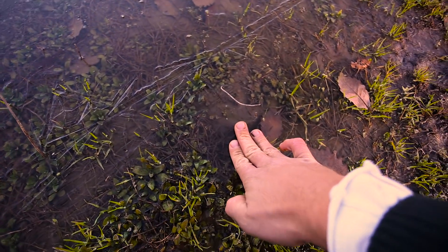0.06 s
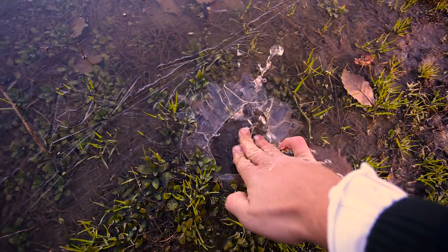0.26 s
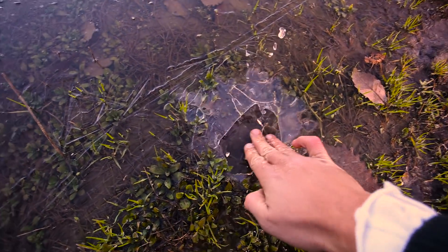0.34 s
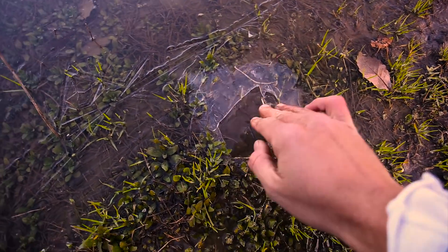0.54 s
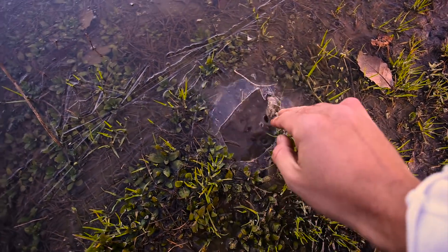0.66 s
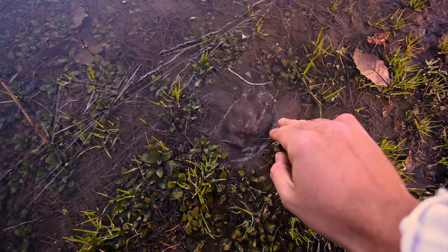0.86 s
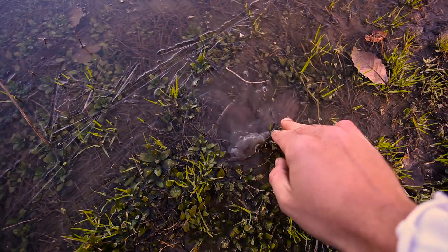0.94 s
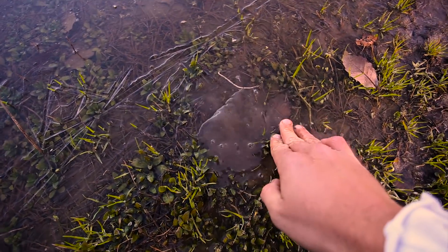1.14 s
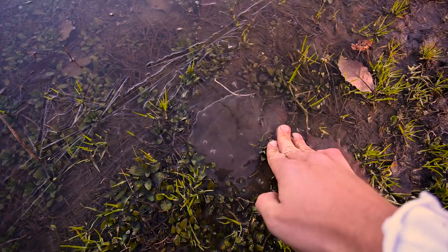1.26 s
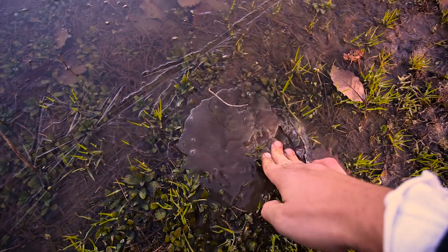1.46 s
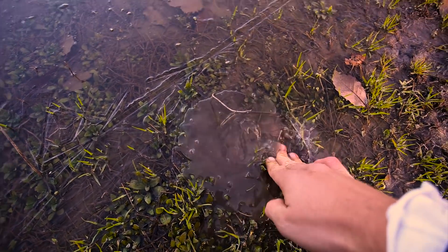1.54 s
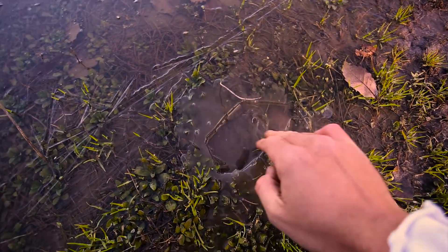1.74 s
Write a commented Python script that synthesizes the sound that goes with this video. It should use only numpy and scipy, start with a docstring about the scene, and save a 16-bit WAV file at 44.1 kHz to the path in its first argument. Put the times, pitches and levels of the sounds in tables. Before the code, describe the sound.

Sharp cracks of thin puddle ice breaking under a hand, with fine crackles and small drips.

```python
"""Outdoors at a shallow muddy puddle, fingers press through thin ice close to the microphone.
The sheet ticks under load, snaps and crunches; a second push breaks it in a run of cracks.
Each crack is a snap with a trail of micro-fractures, and the air pocket under the sheet rings along.
Fine crackle follows the pressure of the hand, shards ping, and the stirred water drips and bubbles.
Behind it lies a quiet wash of air with a distant hum."""
import sys
import numpy as np
from scipy import signal
from scipy.fft import rfft, irfft
from scipy.io import wavfile

SR = 44100
rng = np.random.default_rng(int(sys.argv[2]) if len(sys.argv) > 2 else 0)


def log_audio(samples):
    """Write samples as a 16-bit WAV file to the path given in sys.argv[1]."""
    # one column per channel
    frames = np.atleast_2d(samples).T
    # limit to full scale, then quantise
    limited = np.clip(frames, -1, 1)
    pcm = np.round(limited * 32767).astype(np.int16)
    wavfile.write(sys.argv[1], SR, pcm)


N = 79380
SECOND_PUSH_S = 0.8  # from here on a larger, loosened slab sounds lower
# crackle of the ice under the fingers: t/s, low level/dB, mid level/dB, high level/dB
FINGER_CRACKLE = [(0, -57.5, -53.5, -51), (.1, -58, -52.5, -48), (.19, -48, -48.5, -42.5),
                  (.29, -55, -40, -41), (0.32, -45, -46.5, -53.5), (.36, -40, -40.5, -42),
                  (0.378, -61, -47.5, -45), (.405, -64, -42.5, -44), (.45, -53.5, -47.5, -49.5),
                  (.51, -67.5, -57.5, -55.5), (.7, -61.5, -59, -63.5), (.77, -64, -57.5, -58.5),
                  (.94, -68, -61.5, -63), (1.09, -70, -60, -60), (1.18, -62.5, -66.5, -62.5),
                  (1.27, -60, -56.5, -52), (1.35, -50.5, -50, -47.5), (1.372, -49, -42, -41),
                  (1.41, -52, -37, -33), (1.443, -48, -42, -39), (1.469, -29, -38, -35),
                  (1.507, -37, -41, -27.5), (1.53, -52, -31.5, -36.5), (1.565, -50, -42, -43.5),
                  (1.61, -60, -52.5, -56), (1.655, -59, -47.5, -54), (1.711, -62, -54, -56),
                  (1.8, -66, -68, -68)]


def amp(db):
    """Decibels to gain."""
    return 10 ** (np.asarray(db) / 20)


def unit(x):
    """Scales to rms 1."""
    return x / np.sqrt(np.mean(x ** 2) + 1e-20)


def value_at(points, hz):
    """Reads a curve along a log-frequency axis."""
    f, value = np.transpose(points)
    return np.interp(np.log(hz + 1), np.log(f + 1), value)


def add(mix, s, sound):
    """Mixes a sound in at time s."""
    part = mix[max(round(s * SR), 0):][:len(sound)]
    part += sound[:len(part)]


def band(x, lo_hz, hi_hz, order=2):
    """Causal band-pass."""
    edges_hz = [lo_hz, min(hi_hz, SR / 2 - 1000)]
    return signal.sosfilt(signal.butter(order, edges_hz, "band", fs=SR, output="sos"), x)


def equalise(x, points):
    """Zero-phase EQ through points of f/Hz, level/dB."""
    gain = amp(value_at(points, np.fft.rfftfreq(2 * N, 1 / SR)))
    return irfft(rfft(x, 2 * N) * gain)[:N]


def ice_bands(loosened, slab_low_hz=500):
    """The low, mid and high band the ice sounds in; a loosened slab reaches further down."""
    # firm sheet: lower edge/Hz, upper edge/Hz, 1/e decay/s
    firm_bands = [(728, 1553, 0.0026), (1667, 4050, 0.0024), (6140, 12000, 0.0019)]
    low, *upper = firm_bands
    return [(slab_low_hz, *low[1:]) if loosened else low, *upper]


def fracture(s, run_s, levels_db, snap_height=5.9, spread_db=5.5, size=1500, min_energy=176):
    """One sharp snap, then micro-fractures while the crack runs; the low band dies last."""
    t = np.arange(size) / SR
    noise = rng.standard_normal(size)
    grain_db = spread_db * np.repeat(rng.standard_normal(size // 10), 10)
    grains = unit(noise * amp(grain_db))
    out = np.zeros(size)
    for (lo, hi, decay_s), db in zip(ice_bands(loosened=s > SECOND_PUSH_S), levels_db):
        envelope = np.exp(-np.maximum(t - run_s, 0) / decay_s)
        drive = grains * envelope
        drive[0] = snap_height
        ring = band(drive, lo, hi, order=3)
        energy = max(min_energy, np.sum(envelope ** 2))  # the longest runs carry more energy
        out += amp(db) * ring * np.sqrt(energy / np.sum(ring ** 2))
    return out


def cracks(tick_run_s=0.00027):
    """The sheet ticks under load and breaks in bigger fractures."""
    # fractures of the sheet: t/s, run time/s, low level/dB, mid level/dB, high level/dB
    breaks = [(.2052, 0.00043, -47, -16.5, -11.5), (0.2068, 0.0029, -32, -20, -26),
              (.2283, 0.00053, -52, -31, -15.5), (0.2386, 0.0028, -39, -16.5, -25),
              (.2431, 0.00076, -51, -18, -24), (.2452, 0.0004, -42, -22, -30),
              (0.2551, 0.00051, -23, -32, -27.5), (.2582, 0.0013, -30, -30, -31),
              (0.2653, .001, -32, -24, -39), (1.3546, 0.0019, -21, -19, -19),
              (1.3641, 0.0012, -27.5, -22.5, -21.5), (1.3756, .001, -42, -37, -28),
              (1.3772, .0005, -57, -33, -30), (1.382, 0.00043, -42, -40, -26), (1.398, .001, -40, -34, -27),
              (1.4059, 0.00045, -39, -34, -23), (1.4116, 0.0011, -34.5, -26.5, -27),
              (1.427, .001, -43, -38, -32), (1.4484, .001, -50, -35, -35), (1.4542, 0.0037, -37, -30, -25),
              (1.46, 0.0034, -25.5, -15.5, -16.5), (1.471, 0.0015, -37, -48, -27),
              (1.4745, 0.00067, -20, -17.5, -18), (1.4821, 0.003, -35, -35, -37),
              (1.4875, .0001, -36, -14.5, -17), (1.4886, .0001, -33, -16.5, -19),
              (1.4916, 0.0032, -24.5, -21.5, -14.5), (1.5003, 0.0047, -40, -28, -29),
              (1.509, 0.0013, -34, -28, -23), (1.5127, 0.00067, -34.5, -19.5, -25.5),
              (1.5379, 0.00034, -41, -35, -25.5), (1.5452, 0.0028, -43, -38, -28.5),
              (1.5467, 0.0016, -49, -47, -39), (1.5576, 0.00059, -47, -26.5, -25)]
    # ticks of strained ice and loose shards: t/s, low level/dB, mid level/dB, high level/dB
    ticks = [(0.045, -48, -44, -36), (0.0755, -51, -38.5, -30.5), (0.0959, -43.5, -38.5, -41),
             (0.128, -38.5, -34, -38), (0.1705, -52, -45, -37), (.1732, -63, -54, -40),
             (.287, -70, -56, -35), (0.3263, -37, -43, -37), (.3328, -52, -37.5, -39),
             (0.3529, -33.5, -48, -33.5), (0.3636, -36, -38, -36.5), (.3905, -48, -38, -41),
             (.3961, -41, -30.5, -42), (.411, -42, -54, -41), (.4415, -37.5, -47, -53),
             (0.4624, -57, -38, -56), (0.492, -44, -43.5, -50), (.5176, -51, -51, -65),
             (.5899, -43.5, -42.5, -45), (0.6965, -59, -57, -44.5), (0.752, -58, -48, -46.5),
             (.7844, -57, -48.5, -50), (.821, -62, -43, -46), (0.8586, -68, -48, -51),
             (.8614, -46, -64, -64), (.8892, -48.5, -50.5, -45), (1.0111, -54, -46.5, -49),
             (1.2033, -60, -62, -53), (1.2318, -49.5, -44.5, -44), (1.2559, -49, -44, -41.5),
             (1.2817, -48.5, -48, -48), (1.2887, -70, -50, -43), (1.2996, -59, -42.5, -38),
             (1.59, -50, -40, -43), (1.6233, -56, -43.5, -58), (1.632, -56, -46, -46),
             (1.679, -57, -45, -47), (1.7935, -49.5, -47, -42.5)]
    out = np.zeros(N)
    for s, run_s, *levels_db in breaks:
        add(out, s, fracture(s, run_s, levels_db))
    for s, *levels_db in ticks:
        add(out, s, fracture(s, tick_run_s, levels_db))
    return out


def crackle(curve, per_s, spread_db):
    """A dense rain of tiny fractures of uneven size and colour, riding a three-band level curve."""
    times, *levels_db = np.transpose(curve)
    t, out = np.arange(N) / SR, np.zeros(N)
    onsets = rng.random(N) < per_s / SR
    clicks = onsets * amp(spread_db * np.minimum(rng.exponential(1, N), 4))
    for firm, loose, db in zip(ice_bands(loosened=False), ice_bands(loosened=True), levels_db):
        drive = clicks * rng.standard_normal(N)
        firm_grains = unit(band(drive, *firm[:2], order=3))
        loose_grains = unit(band(drive, *loose[:2], order=3))
        grains = np.where(t > SECOND_PUSH_S, loose_grains, firm_grains)
        out += grains * amp(np.interp(t, times, db, left=-120, right=-120))
    return out


def crunch():
    """The sheet crumbles after the first snap in a short, thick burst of crackle."""
    # crumbling ice: t/s, low level/dB, mid level/dB, high level/dB
    crumble = [(.206, -39, -60, -60), (.21, -14, -34, -19), (.217, -39, -32, -26), (.221, -34, -22, -18.5),
               (.229, -23, -20.5, -17), (.236, -33.5, -21, -17.5), (.245, -33, -33, -32),
               (.251, -54, -34, -39), (.262, -34, -28, -36), (.275, -54, -41, -54), (.285, -67, -62, -60)]
    return crackle(crumble, per_s=14000, spread_db=4.5)


def air_pocket(ice):
    """The hollow under the sheet rings with the ice, most of all as it opens in the second push."""
    # swell of the ring: t/s, relative level/dB
    swell = [(1.15, -18), (1.24, 5), (1.32, -2), (1.35, -24), (1.42, -18), (1.48, -8), (1.56, -7),
             (1.66, -11), (1.75, -27)]
    # resonances of the hollow: f/Hz, width/Hz, relative level/dB
    modes = [(496, 64, 4), (760, 23, 2.5)]
    times, swell_db = np.transpose(swell)
    ring = np.zeros(N)
    for hz, width_hz, db in modes:
        ring += amp(db) * signal.lfilter(*signal.iirpeak(hz, hz / width_hz, SR), ice)
    return 2 * ring * amp(np.interp(np.arange(N) / SR, times, swell_db))


def pings(size=3000):
    """Each loose shard or drop rings one dying tone."""
    # shards and drops: t/s, f/Hz, t60/s, level/dB
    rings = [(0.2075, 1000, 0.015, -17.5), (0.5912, 1100, 0.022, -45), (0.5891, 4730, 0.022, -48),
             (0.699, 8370, 0.0085, -33), (.6974, 9300, .01, -41), (.821, 1860, 0.03, -40),
             (0.823, 4320, .014, -48), (.8588, 580, .04, -47), (0.8624, 2620, .018, -38),
             (.8892, 560, 0.056, -55), (1.4746, 720, 0.016, -23.5), (1.623, 2270, 0.02, -30.5),
             (1.678, 3300, 0.01, -33), (1.7935, 3380, 0.014, -27.5)]
    t, out = np.arange(size) / SR, np.zeros(N)
    for s, hz, t60, db in rings:
        add(out, s, amp(db - 60 * t / t60) * np.sin(2 * np.pi * hz * t))
    return out


def droplets(per_s=330, pitches=30, decay_cycles=8.4, rise=0.0774, gain_db=2, spread_db=4):
    """Tiny drops and bubbles blip upward in pitch, following the crackle that stirs the water."""
    times, _, stir_db, _ = np.transpose(FINGER_CRACKLE)
    t, out = np.arange(1200) / SR, np.zeros(N)
    for hz in np.geomspace(798, 11490, pitches):
        age = hz * t / decay_cycles
        rising_hz = hz * (1 + rise * np.minimum(age, 2))
        blip = np.exp(-age) * np.sin(2 * np.pi * np.cumsum(rising_hz) / SR)
        onsets = rng.random(N) < per_s / pitches / SR
        strengths = amp(spread_db * np.minimum(rng.exponential(1, N), 2))
        out += signal.oaconvolve(onsets * strengths, blip)[:N]
    return out * amp(gain_db + np.interp(np.arange(N) / SR, times, stir_db))


def glides(rows, skew):
    """Short tones that glide in pitch; a skew below 1 puts the crest early."""
    out = np.zeros(N)
    for s, length_s, start_hz, end_hz, db in rows:
        progress = np.linspace(0, 1, int(length_s * SR))
        cycles = np.cumsum(start_hz + (end_hz - start_hz) * progress) / SR
        envelope = np.sin(np.pi * progress ** skew)
        add(out, s, amp(db) * np.sqrt(2) * envelope * np.sin(2 * np.pi * cycles))
    return out


def bubbles():
    """Air freed under the ice: each bubble is a chirp with a quick attack."""
    # bubbles: t/s, length/s, start f/Hz, end f/Hz, level/dB
    chirps = [(.2655, 0.0057, 917, 850, -21), (.2465, 0.012, 3060, 3670, -30),
              (.2695, .007, 3050, 3660, -32), (.3335, 0.0041, 2770, 2850, -39),
              (.4925, 0.0044, 3180, 2840, -35), (.5015, 0.0044, 3400, 3660, -46),
              (.525, 0.0046, 1260, 1020, -40.5), (.8888, 0.0037, 1330, 1460, -40),
              (1.3925, 0.0092, 1620, 1700, -33), (1.5302, 0.0087, 980, 1860, -16.5),
              (1.559, 0.0063, 1530, 2110, -30.5), (1.567, 0.012, 940, 736, -35.5),
              (1.58, 0.027, 860, 1820, -40.5), (1.634, 0.019, 1785, 1830, -44.5),
              (1.694, .007, 2250, 2470, -55)]
    return glides(chirps, skew=0.67)


def whistles():
    """Faint, high whistles that swell and slide."""
    # whistles: t/s, length/s, start f/Hz, end f/Hz, level/dB
    slides = [(.925, 0.024, 4150, 3150, -57.5), (1.105, 0.031, 4010, 3200, -58.5),
              (1.694, 0.044, 4020, 4620, -49)]
    return glides(slides, skew=1.1)


def shoves():
    """A soft, low puff of noise as the hand shoves slab and water down."""
    # pushes of the hand: t/s, length/s, level/dB
    pushes = [(0.204, 0.066, -43.5), (1.455, 0.079, -61)]
    out = np.zeros(N)
    for s, length_s, db in pushes:
        rumble = unit(band(rng.standard_normal(N), lo_hz=110, hi_hz=524, order=1))
        window = np.hanning(int(length_s * SR))
        add(out, s, amp(db) * window * rumble[:len(window)])
    return out


def reflections(x, level_db=-18, size=12000):
    """A short, weak tail scattered back from the ground and the arm."""
    decay = [(300, 0.2), (2000, 0.059), (8000, 0.066), (15000, 0.035)]  # f/Hz, t60/s
    hz, t, noise = signal.stft(rng.standard_normal(size), SR, nperseg=256)
    fade = amp(-60 * t / value_at(decay, hz)[:, None])
    tail = signal.istft(noise * fade, SR)[1]
    return amp(level_db) * signal.fftconvolve(x, tail / np.linalg.norm(tail))[:N]


def outdoor_air(wash_db=-58.5, hum_hz=70.6, hum_db=-70.5):
    """A quiet wash of noise with a distant, wavering hum."""
    # spectrum of still air: f/Hz, relative level/dB
    spectrum = [(20, -20), (45, -13), (72, -5.5), (100, -3), (170, -0.5), (300, -2.5), (600, -5),
                (1500, -20), (3500, -11), (5500, -24.5), (10000, -24.5), (16000, -25)]
    hum = unit(band(rng.standard_normal(N), hum_hz - 4, hum_hz + 4))
    wash = unit(equalise(rng.standard_normal(N), spectrum))
    return amp(wash_db) * wash + amp(hum_db) * hum


def scene():
    """Ice and water up close, outdoor air behind, in mono."""
    ice = cracks() + crunch() + crackle(FINGER_CRACKLE, per_s=5000, spread_db=3.5)
    near = ice + air_pocket(ice) + pings() + droplets() + bubbles() + whistles()
    return (near + reflections(near) + shoves() + outdoor_air())[None]


def record(dry):
    """The microphone colours the sound, clips at full scale and loses the very top."""
    # tone of the microphone: f/Hz, level/dB
    mic_tone = [(100, -1), (300, -1.5), (450, 1.5), (800, -4.5), (1400, -2), (2200, -2), (3400, -1.5),
                (5000, 0), (6500, -4.5), (9000, -0.5), (12000, -3), (15500, 5.5)]
    clipped = np.clip(equalise(dry[0], mic_tone), -1, 1)
    low_pass = signal.firwin(511, cutoff=15900, window=("kaiser", 9), fs=SR)
    return signal.oaconvolve(clipped, low_pass, "same")[None]


dry = scene()
out = record(dry)
log_audio(out)
```